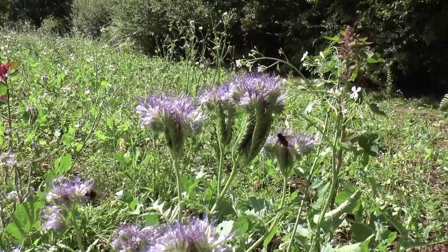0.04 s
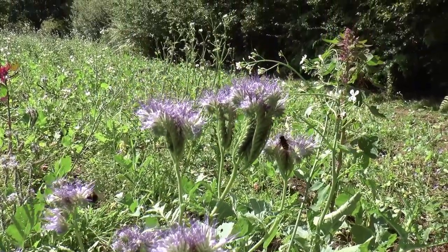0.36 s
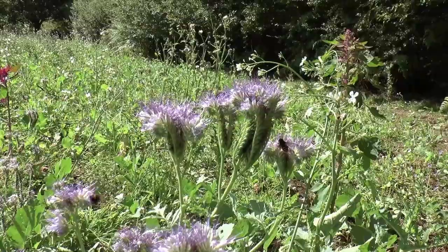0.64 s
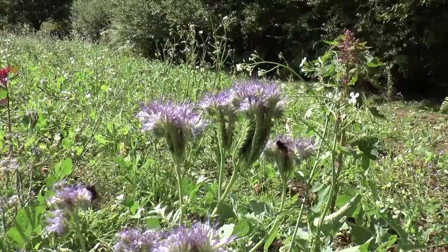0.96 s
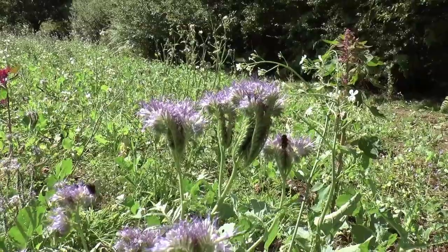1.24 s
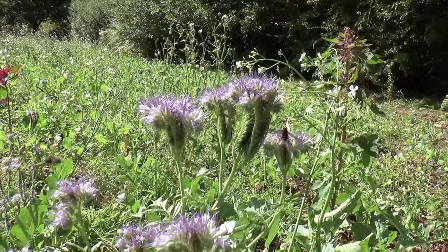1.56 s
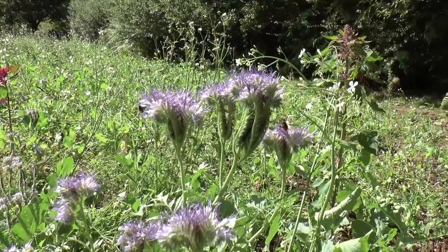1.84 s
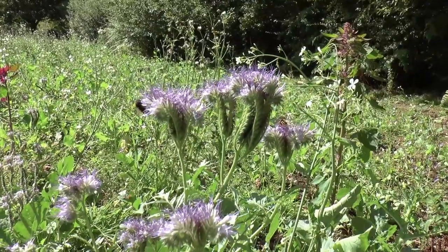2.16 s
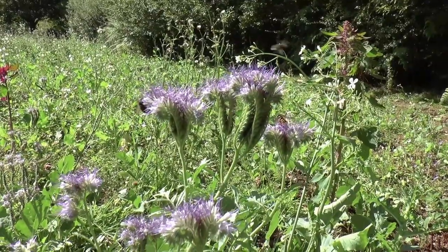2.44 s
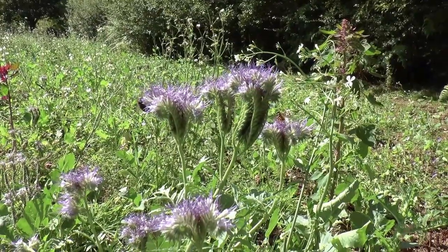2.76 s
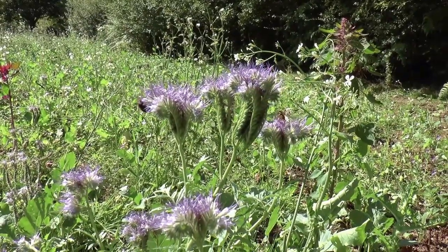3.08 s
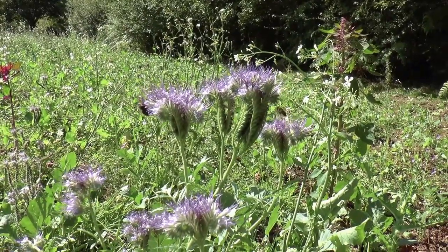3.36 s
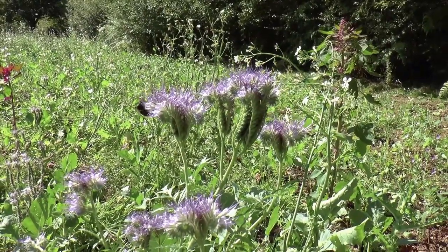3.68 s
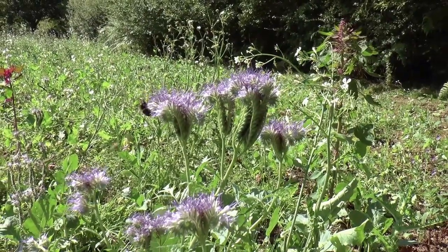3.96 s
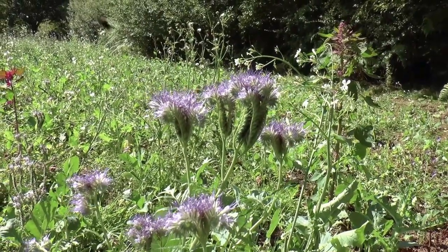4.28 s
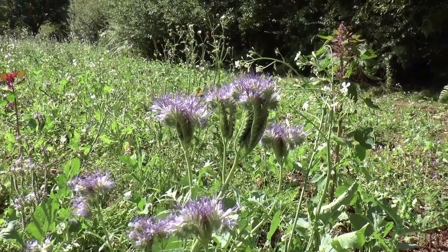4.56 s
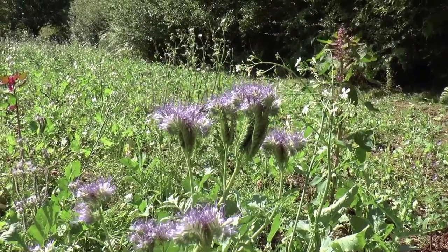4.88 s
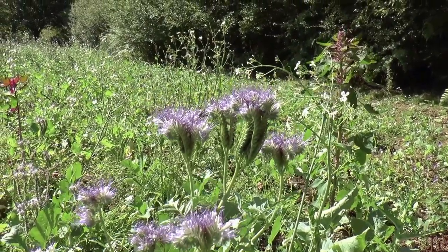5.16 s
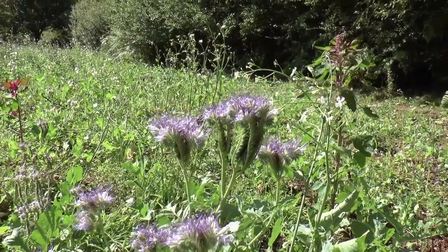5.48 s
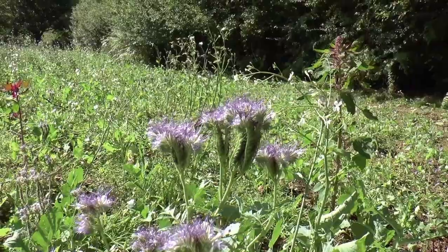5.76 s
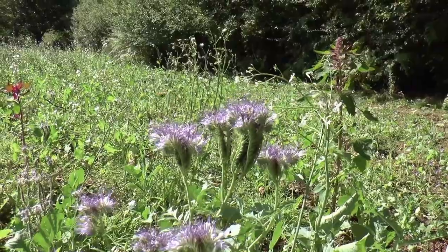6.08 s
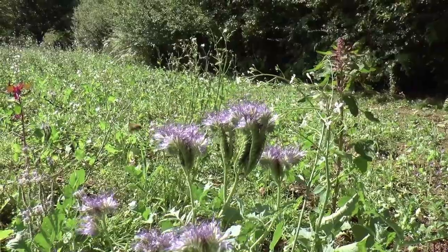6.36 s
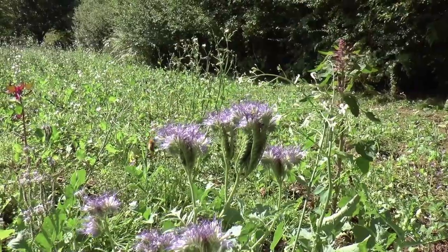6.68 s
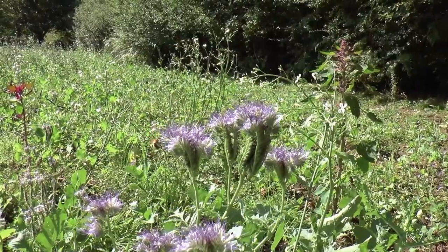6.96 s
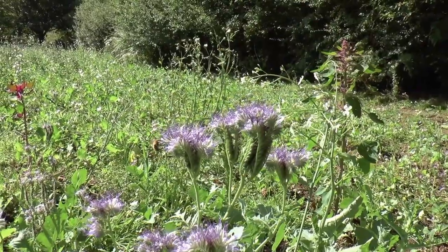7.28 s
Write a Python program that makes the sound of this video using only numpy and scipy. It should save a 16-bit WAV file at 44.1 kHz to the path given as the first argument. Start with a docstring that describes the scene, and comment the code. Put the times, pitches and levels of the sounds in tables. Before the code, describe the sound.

A light breeze rustles grass and leaves outdoors while a small bird repeats short, high chirps over a faint low buzz.

```python
"""Breezy field by a wood

A light breeze rustles leaves and grass, a wash of noise grained with tiny contacts; dry stems tick.
Air rumbles on the microphone, a low drone comes and goes, and a faint hum hangs in the distance.
A small bird whistles a soft lead-in and two quick upward sweeps, again and again; others peep
further off, and ground and trees echo them. Everything is on the left channel."""
import sys
import numpy as np
from scipy import signal
from scipy.fft import rfft, irfft, next_fast_len
from scipy.io import wavfile

SR = 44100
rng = np.random.default_rng(int(sys.argv[2]) if len(sys.argv) > 2 else 0)


def store_pcm(level_fs):
    """Save levels as 16-bit WAV."""
    pcm = np.round(np.clip(level_fs, -1, 1) * 32767).astype(np.int16)
    wavfile.write(sys.argv[1], SR, np.atleast_2d(pcm).T)


N = 332073

# envelope of the wind further off: t/s, relative level/dB
FAR_WIND = [(0.0, -59), (0.04, -58.5), (2.03, -63), (2.47, -56.5), (2.75, -60.5), (2.89, -60), (3.21, -64),
            (3.38, -56), (3.44, -62.5), (3.73, -58.5), (3.96, -61), (4.7, -60.5), (4.74, -56),
            (4.82, -62.5), (6.54, -61), (6.58, -60.5), (7.42, -66), (7.53, -66)]


def from_db(db):
    """Decibels to gain."""
    return 10 ** (np.asarray(db) / 20)


def rms_one(x):
    """Scale to rms 1."""
    return x / np.sqrt(np.mean(x ** 2) + 1e-20)


def envelope(points):
    """Join (time, value) breakpoints with straight lines, one value per sample."""
    times, values = np.transpose(points)
    return np.interp(np.arange(N) / SR, times, values)


def swell(middle, length):
    """A smooth rise from 0 to 1 and back, timed in seconds."""
    return np.cos(np.pi * np.clip((np.arange(N) / SR - middle) / length, -.5, .5)) ** 2


def drift(rate_hz):
    """A smooth random modulator of rms 1: noise low-passed at rate_hz."""
    hop, settle = 40, 2000
    r = np.exp(-2 * np.pi * rate_hz * hop / SR)
    noise = rng.standard_normal(N // hop + settle + 2)
    slow = signal.lfilter([1], [1, -2 * r, r * r], noise)[settle:]
    return np.interp(np.arange(N) / hop, np.arange(len(slow)), rms_one(slow))


def colour(x, spectrum):
    """EQ a sound with a curve that rolls off steeply beyond its ends; rms 1."""
    size = next_fast_len(N)
    log_hz = np.log(np.maximum(np.arange(size // 2 + 1) * SR / size, 1))
    points_hz, points_db = np.transpose(spectrum)
    beyond = np.abs(log_hz - np.clip(log_hz, np.log(points_hz[0]), np.log(points_hz[-1])))
    gain = from_db(np.interp(log_hz, np.log(points_hz), points_db)) * np.exp(-2 * np.pi * beyond)
    return rms_one(irfft(rfft(x, size) * gain, size)[:N])


def coloured_noise(spectrum):
    """Noise shaped by an EQ curve; rms 1."""
    return colour(rng.standard_normal(N), spectrum)


def resonate(x, hz, width):
    """One resonance with unity gain at its peak."""
    r = np.exp(-np.pi * width / SR)
    feedback = [1, -2 * r * np.cos(2 * np.pi * hz / SR), r * r]
    return signal.lfilter(np.array([1, 0, -1]) * (1 - r * r) / 2, feedback, x + 1e-18)


def touches(per_s, spread_db=4.5, clump_db=3.0):
    """Leaf contacts: clicks of uneven size that come in random clumps; rms 1."""
    hits = rng.random(N) < per_s * from_db(clump_db * drift(10)) / SR
    sizes = from_db(spread_db * np.minimum(rng.exponential(1, N), 4))
    return rms_one(hits * sizes * rng.choice([-1, 1], N))


def foliage(spectrum, near_db, per_s, flutter_db):
    """Far leaves merge into a fluttering wash of noise; near ones add grain."""
    far = rng.standard_normal(N) * from_db(flutter_db * drift(3.4))
    near = from_db(near_db) * touches(per_s)
    return colour(far + near, spectrum)


def patches(x, depth_db, bands=20):
    """Neighbouring bands swell and fade on their own, as different plants stir; rms 1."""
    size = next_fast_len(N)
    spectrum, hz = rfft(x, size), np.arange(size // 2 + 1) * SR / size
    centres_hz = np.geomspace(1700, 9000, bands)
    out = np.zeros(N)
    for share in np.eye(bands):
        band = irfft(spectrum * np.interp(hz, centres_hz, share), size)[:N]
        out += band * from_db(depth_db * drift(3))
    return rms_one(out)


def leaves(hiss_fade_db_per_s=0.15, sizzle_fade_db_per_s=0.48):
    """One breeze makes broad leaves rustle, small ones hiss and dry grass sizzle; the top slowly fades."""
    # envelope of the breeze in the leaves: t/s, relative level/dB
    breeze = [(0.0, -49.5), (2.56, -50.5), (3.26, -51.5), (3.59, -51), (5.19, -51.5), (5.23, -49.5),
              (5.49, -52), (6.24, -49.5), (6.56, -52.5), (6.58, -49), (6.68, -51.5), (6.85, -50)]
    # EQ of broad leaves, small leaves and dry grass: f/Hz, relative level/dB
    rustle_eq = [(1550, -14), (1620, -5), (1720, -3), (2100, 0.4), (2700, 0.5), (3200, 1), (3550, 0.5),
                 (3900, -2.5), (4500, -66)]
    hiss_eq = [(3300, -6), (3900, -2), (4400, 0), (4900, -1), (5600, -3.5), (6400, -3), (7200, -10.5),
               (8200, -16), (9500, -17.5)]
    sizzle_eq = [(6800, -7), (8400, -6), (9400, -1.5), (10300, -1), (11500, -6.5), (13000, -11),
                 (15800, -14.5)]
    # brief dropouts in the hiss and rustle bands: middle t/s, length/s, rustle cut/dB, hiss cut/dB
    dips = [(5.137, 0.26, 0.5, 2.5), (5.328, 0.23, 0.5, 7.5), (6.941, 0.27, 6.5, 9), (7.104, 0.27, 3, 4.5)]
    t = np.arange(N) / SR
    breeze_db = envelope(breeze)
    rustle_db = breeze_db + 7
    hiss_db = breeze_db + 7.5 - hiss_fade_db_per_s * t
    sizzle_db = breeze_db + 1.26 - sizzle_fade_db_per_s * t
    for middle, length, rustle_cut_db, hiss_cut_db in dips:
        rustle_db -= rustle_cut_db * swell(middle, length)
        hiss_db -= hiss_cut_db * swell(middle, length)
    broad = foliage(rustle_eq, near_db=-6.5, per_s=1500, flutter_db=1.15)
    small = foliage(hiss_eq, near_db=-5.5, per_s=1900, flutter_db=0.34)
    rustle = from_db(rustle_db) * patches(broad, depth_db=1.0)
    hiss = from_db(hiss_db) * patches(small, depth_db=1.3)
    sizzle = from_db(sizzle_db) * foliage(sizzle_eq, near_db=-6.5, per_s=2000, flutter_db=0.8)
    return rustle + hiss + sizzle


def air(buffet_db=8.0, deep_db=2, deepen=0.62, rush_db=8.5, lumps_db=1.5, floor_db=-73):
    """Lumpy buffeting on the microphone, deeper in strong gusts, over a far rush of wind and a low bed."""
    # gusts hitting the microphone: t/s, relative level/dB
    gusts = [(0.0, -60.5), (1.17, -57), (1.23, -71), (1.45, -56), (1.75, -63.5), (1.85, -59), (2.1, -59.5),
             (3.08, -59.5), (3.2, -67), (3.54, -58.5), (3.61, -63.5), (4.7, -58), (4.74, -64), (5.22, -58),
             (5.42, -55.5), (5.66, -56.5), (5.77, -61.5), (6.1, -50), (6.14, -57), (6.48, -55),
             (6.8, -47.5), (6.92, -58.5), (7.53, -50)]
    # EQ of the buffeting, its deep end, the far rush and the low bed: f/Hz, relative level/dB
    buffet_eq = [(50, -36), (75, -25.5), (100, -19.5), (118, -20.5), (138, -4.5), (163, 1), (182, -3),
                 (210, -2.5), (240, -16.5), (400, -24)]
    deep_eq = [(95, -27), (132, 5.5), (155, 1.5)]
    rush_eq = [(110, -32), (200, -2), (260, 1), (330, -3), (400, -6), (440, -3), (490, -15), (700, -32),
               (1000, -16.5)]
    floor_eq = [(20, -2), (50, -5.5), (80, -5), (110, 9), (160, -26)]
    gust_db = envelope(gusts)
    lull_db = gust_db.max() - gust_db
    buffet = from_db(gust_db + buffet_db) * coloured_noise(buffet_eq)
    deep = from_db(gust_db + deep_db - deepen * lull_db) * coloured_noise(deep_eq)
    rush = from_db(envelope(FAR_WIND) + rush_db) * coloured_noise(rush_eq)
    lumps = from_db(lumps_db * drift(17.0))
    return (buffet + deep) * lumps + rush + from_db(floor_db) * coloured_noise(floor_eq)


def far_murmur(level_db=-55.0, follow=0.45, waver_db=2.5):
    """A hollow backdrop of wavering noise bands that swells with the far wind."""
    # resonances of the backdrop: f/Hz, width/Hz, relative level/dB
    resonances = [(572, 79, -1.5), (736, 106, -1), (832, 70, -6.5), (1103, 103, -6), (1233, 50, -6),
                  (1379, 93, -3.5), (1463, 75, -3)]
    murmur = np.zeros(N)
    for hz, width, db in resonances:
        band = signal.butter(2, [hz - width / 2, hz + width / 2], "band", fs=SR, output="sos")
        murmur += from_db(db + waver_db * drift(3.2)) * signal.sosfilt(band, rng.standard_normal(N))
    wind_db = envelope(FAR_WIND)
    return from_db(level_db + follow * (wind_db - wind_db.mean())) * rms_one(murmur)


def far_hum(waver_db=1.5, wander_hz=1.5):
    """A thin, distant hum: two tones an octave apart, each wavering in level and pitch."""
    # centre values of the tones: f/Hz, rms level/dB
    partials = [(363.5, -68), (727, -67.5)]
    hum = np.zeros(N)
    for hz, db in partials:
        gain = np.sqrt(2) * from_db(db + waver_db * drift(1.3))
        phase = 2 * np.pi * np.cumsum(hz + wander_hz * drift(1.95)) / SR
        hum += gain * np.sin(phase)
    return hum


def sweeps(calls, lead_ahead_s=0.022, second_after_s=0.0245):
    """Each call is a soft, low lead-in and two full sweeps, the second a little higher and longer."""
    for start, db, top_hz, lead_db, stress_db, second_db in calls:
        # t/s, relative level/dB, top f/Hz, length/s, stress/dB
        yield start - lead_ahead_s, db + lead_db, top_hz * .77, .012, 0
        yield start, db, top_hz, .0155, stress_db
        yield start + second_after_s, db + second_db, top_hz * 1.04, .018, stress_db


def bird(gain_db=3.5, reedy_below_hz=1600, pure_above_hz=4120, facing_away=0.32):
    """Rough whistles climb and hook down, reedy low and pure on top; returns direct sound and tree send."""
    # calls: first full sweep t/s, relative level/dB, its top f/Hz, lead-in offset/dB,
    # stress on the top of a sweep/dB, second sweep offset/dB
    calls = [(0.125, -35, 5410, -2, 3, -4), (1.096, -37.5, 5400, -22, -1, -4),
             (1.505, -40.5, 5600, -6, 4, -6), (1.766, -36.5, 5230, -22, 2, -4),
             (2.629, -37.5, 5250, -2, .5, -0.5), (3.665, -35, 5050, -5, 2, -1),
             (4.695, -40.5, 5400, -5, 0, -1), (5.486, -35.5, 5370, -11, 0, 0),
             (6.26, -37.5, 5190, -12, 3, 0.5), (6.597, -31, 5270, -8, 0, 0),
             (7.260, -27, 5570, -9, 1, -1.5)]
    # contour of one sweep: share of its length, share of top pitch, relative amplitude
    contour = [(0, .5, 0), (.1, .51, .15), (.24, .57, .3), (.36, .73, .85), (.55, .82, 1.05), (.68, .9, .8),
               (.82, 1, .8), (.91, .94, .65), (1, .76, .25)]
    along, pitch, amplitude = np.transpose(contour)
    usual_db = np.mean([db for _, db, *_ in calls])
    jitter = 1 + .035 * drift(350)
    roughness = from_db(2 * drift(400))
    direct, send = np.zeros((2, N))
    for start, db, top_hz, length, stress_db in sweeps(calls):
        at = int(start * SR) + np.arange(int(length * SR))
        progress = np.linspace(0, 1, len(at))
        hz = top_hz * np.interp(progress, along, pitch) * jitter[at]
        phase = 2 * np.pi * np.cumsum(hz) / SR
        reedy = np.interp(hz, [reedy_below_hz, pure_above_hz], [1, 0])
        whistle = np.sin(phase) + reedy * np.sin(2 * phase)
        tilt_db = stress_db * np.interp(hz / top_hz, [.75, 1], [-1, .5])
        shape = np.interp(progress, along, amplitude) * roughness[at]
        note = from_db(db + gain_db + tilt_db) * shape * whistle
        direct[at] += note
        # a faint call is sung facing away: part of its lost level still reaches the trees
        send[at] += from_db(facing_away * (usual_db - db)) * note
    return direct, send


def outdoors(direct, send, ground_db=-11, ground_s=0.0047, trees_db=-5.5, rise_s=0.0058, t60_s=0.26):
    """The ground adds one early echo; the trees scatter the send into a tail that builds and dies away."""
    ground = from_db(ground_db) * np.interp(np.arange(N) - ground_s * SR, np.arange(N), direct)
    t = np.arange(SR // 2) / SR
    tail = rng.standard_normal(len(t)) * np.minimum(t / rise_s, 1) * from_db(-60 * t / t60_s)
    trees = from_db(trees_db) * signal.fftconvolve(send, tail / np.linalg.norm(tail))[:N]
    return direct + ground + trees


def far_birds():
    """Other birds peep from the wood: thin, quavering glides that swell and fade."""
    # peeps: t/s, length/s, start f/Hz, end f/Hz, peak level/dB
    peeps = [(0.56, 0.027, 3800, 4500, -41), (1.237, 0.017, 3760, 3100, -40),
             (1.281, 0.0076, 2480, 2080, -35), (3.18, .085, 7340, 7650, -51), (3.415, .06, 6700, 6350, -49),
             (5.101, 0.01, 3900, 3650, -40), (5.691, 0.0091, 5930, 6600, -40),
             (6.222, 0.016, 4480, 4250, -35.5), (6.238, .012, 3940, 2680, -41),
             (6.287, 0.0098, 2870, 4070, -34.5)]
    out = np.zeros(N)
    quaver = 1 + .025 * drift(200)
    for start, length, from_hz, to_hz, db in peeps:
        at = int(start * SR) + np.arange(int(length * SR))
        phase = 2 * np.pi * np.cumsum(np.linspace(from_hz, to_hz, len(at)) * quaver[at]) / SR
        out[at] += from_db(db) * signal.windows.tukey(len(at), .5) * np.sin(phase)
    return out


def drone(wander_hz=1.98, waver_db=1.6, rate_hz=7):
    """Nearly pure low tones swell out of the rumble, wavering in pitch and level."""
    # swells of the drone: middle t/s, length/s, f/Hz, rms level at the crest/dB
    swells = [(0.68, 0.23, 168.3, -49), (1.03, 0.63, 166, -52), (1.486, .25, 258, -56),
              (1.856, .25, 177, -55), (2.92, .3, 251.4, -53), (4.752, 0.19, 295, -51), (5.56, .5, 165, -48),
              (6.733, 0.39, 156, -47), (7.363, 0.48, 157.1, -45)]
    wander = wander_hz * drift(rate_hz)
    tones = np.zeros(N)
    for middle, length, hz, db in swells:
        phase = 2 * np.pi * (np.cumsum(hz + wander) / SR + rng.random())
        tones += from_db(db) * swell(middle, length) * np.sin(phase)
    return np.sqrt(2) * from_db(waver_db * drift(rate_hz)) * tones


def stems(gain_db=14.0, snap_s=0.0012, soft_hz=12500):
    """Each tick is a tiny, soft-edged snap that rings a dry stem."""
    # ticks: t/s, relative peak level/dB
    ticks = [(1.0923, -38.5), (1.4814, -46), (2.2433, -44), (3.025, -44), (5.2809, -45), (5.559, -41),
             (5.5763, -44), (5.592, -38.5), (5.8904, -47), (5.9279, -46), (5.9444, -43), (6.237, -46),
             (6.356, -43.5), (6.8209, -41), (7.002, -49), (7.0374, -41.5)]
    # modes of a stem: f/Hz, width/Hz, relative level/dB
    modes = [(3300, 1500, -8), (5950, 980, -8), (9250, 910, -2)]
    out = np.zeros(N)
    t = np.arange(SR // 100) / SR
    soften = signal.butter(2, soft_hz, fs=SR, output="sos")
    for start, db in ticks:
        snap = signal.sosfilt(soften, rng.standard_normal(len(t)) * np.exp(-t / snap_s))
        tick = sum(from_db(mode_db) * resonate(snap, hz, width) for hz, width, mode_db in modes)
        out[int(start * SR) + np.arange(len(t))] += from_db(db + gain_db) * tick / np.abs(tick).max()
    return out


def near_grass():
    """Grass brushes past close by in short, bright, grainy swishes."""
    # swishes: middle t/s, length/s, rms level at the crest/dB
    brushes = [(5.09, 0.29, -47.5), (5.316, 0.27, -48.5), (5.486, 0.26, -50), (5.936, 0.11, -67),
               (6.623, 0.11, -60), (6.892, 0.23, -46), (7.05, 0.16, -51), (7.347, 0.32, -51.5)]
    # EQ of the close grass: f/Hz, relative level/dB
    grass_eq = [(7500, -13), (9400, 2), (10400, 3.5), (11800, -6.5), (13200, -11), (15800, -11)]
    brushing = sum(from_db(db) * swell(middle, length) for middle, length, db in brushes)
    return brushing * foliage(grass_eq, near_db=-2, per_s=3000, flutter_db=1.0)


def scene():
    """The mix sits on the left, with echoes on the birds only; the right is silent."""
    direct, send = bird()
    peeps = far_birds()
    birds = outdoors(direct + peeps, send + peeps)
    ambience = leaves() + near_grass() + air() + drone() + far_murmur() + far_hum()
    return np.array([ambience + birds + stems(), np.zeros(N)])


def record(dry, cutoff_hz=15850):
    """A steep low-pass takes off the very top."""
    return signal.sosfilt(signal.ellip(12, .1, 80, cutoff_hz, fs=SR, output="sos"), dry)


dry = scene()
out = record(dry)
store_pcm(out)
```